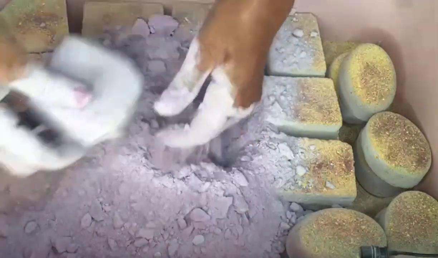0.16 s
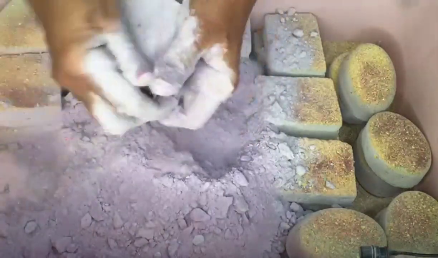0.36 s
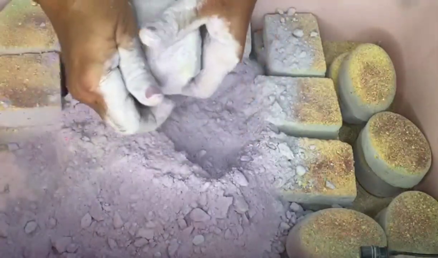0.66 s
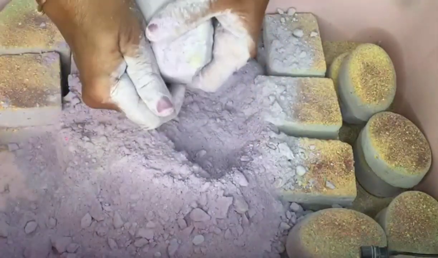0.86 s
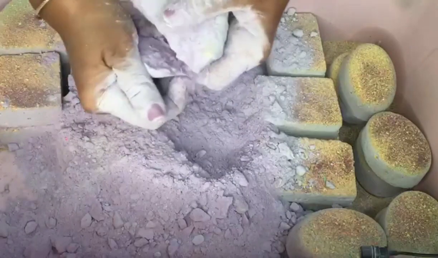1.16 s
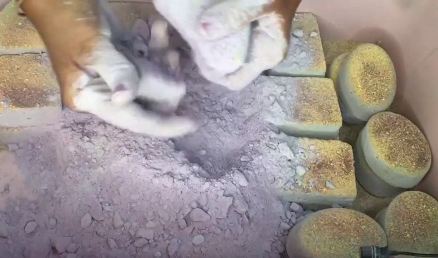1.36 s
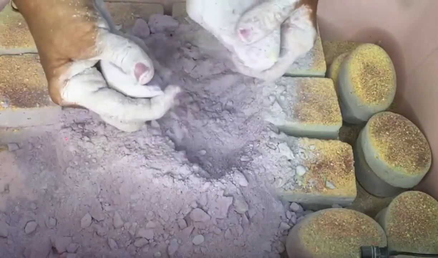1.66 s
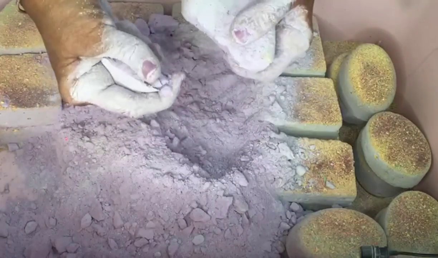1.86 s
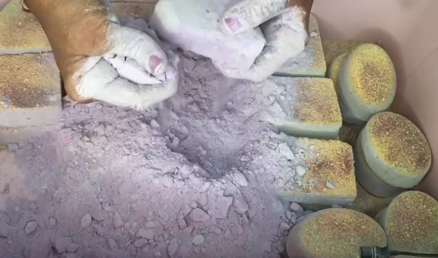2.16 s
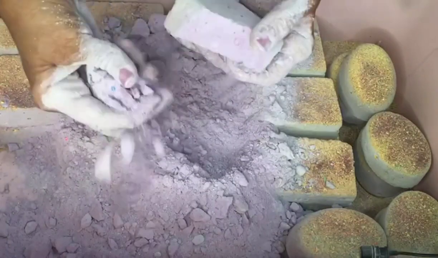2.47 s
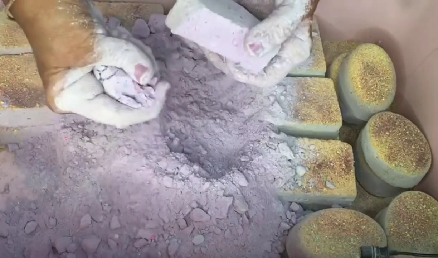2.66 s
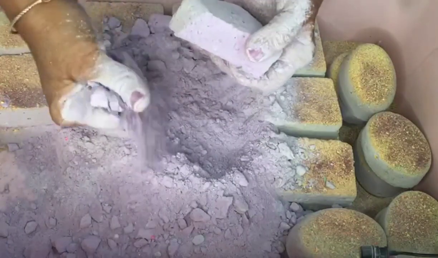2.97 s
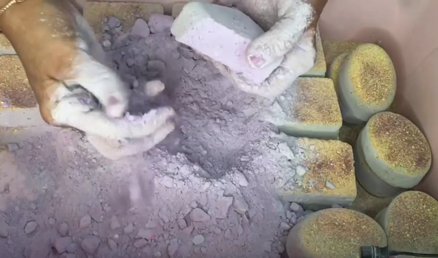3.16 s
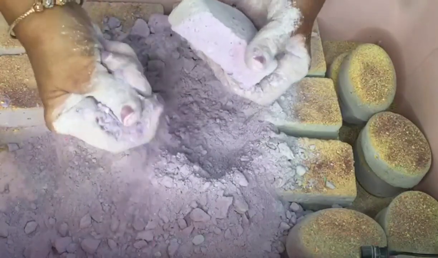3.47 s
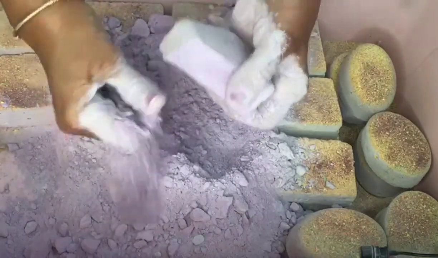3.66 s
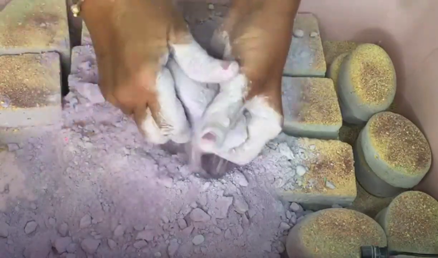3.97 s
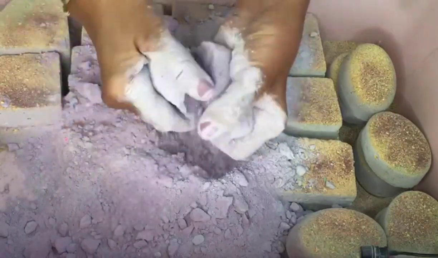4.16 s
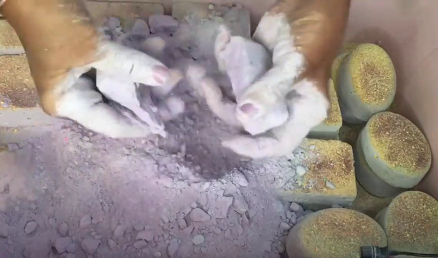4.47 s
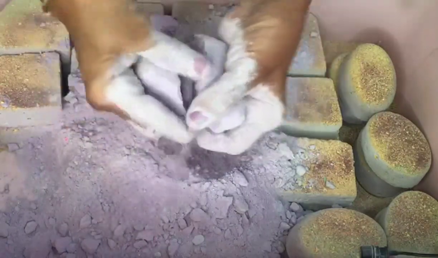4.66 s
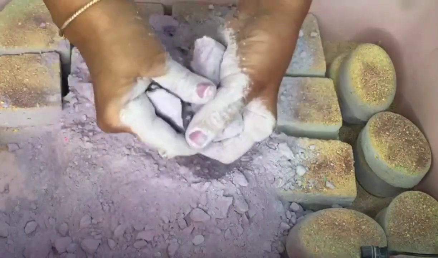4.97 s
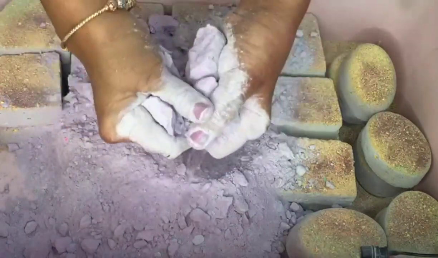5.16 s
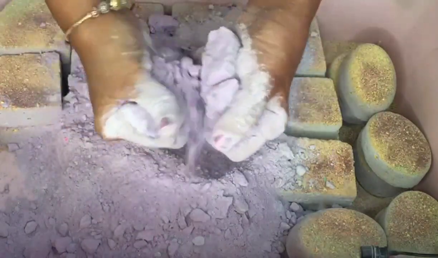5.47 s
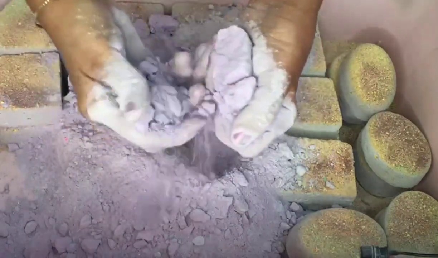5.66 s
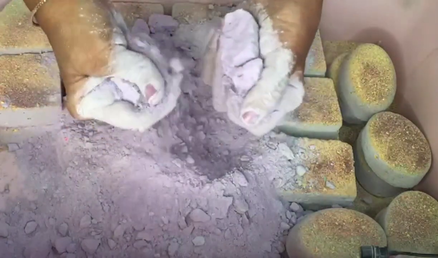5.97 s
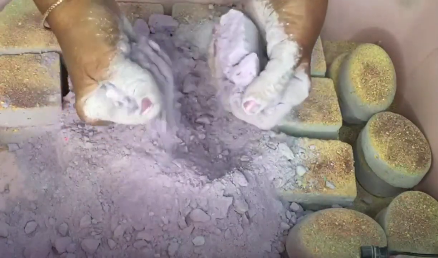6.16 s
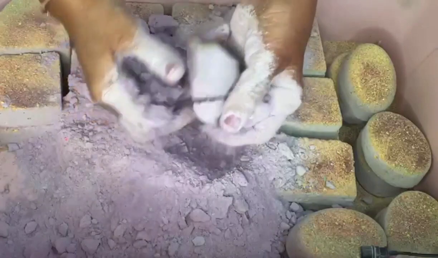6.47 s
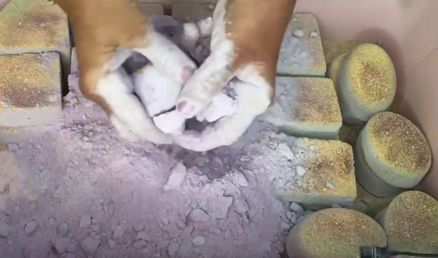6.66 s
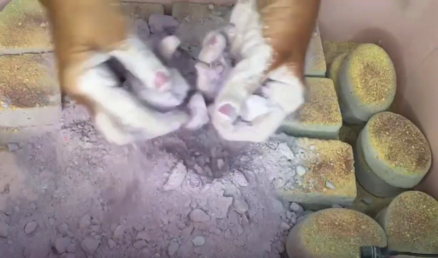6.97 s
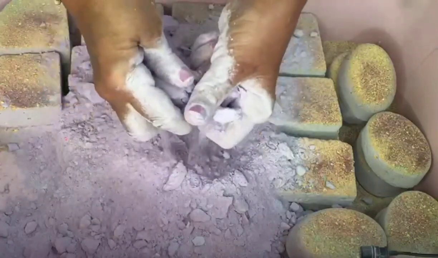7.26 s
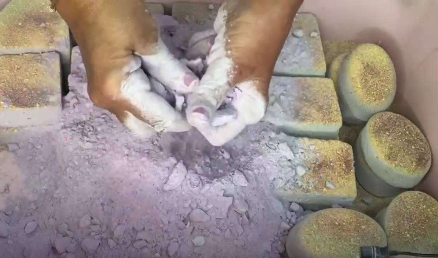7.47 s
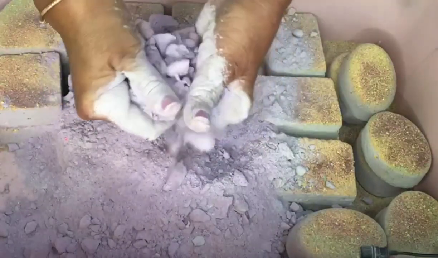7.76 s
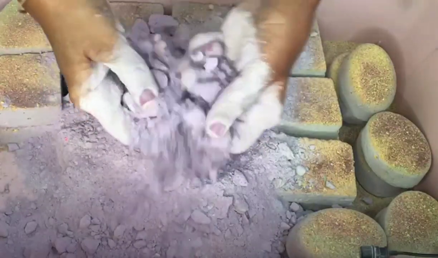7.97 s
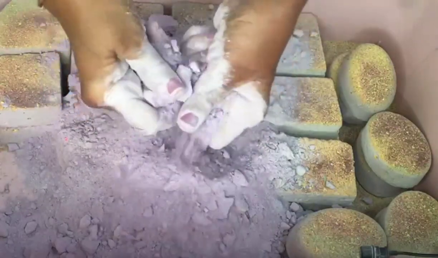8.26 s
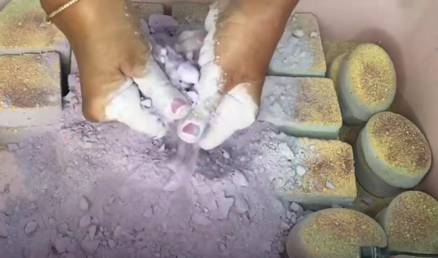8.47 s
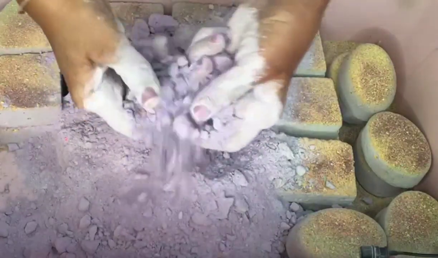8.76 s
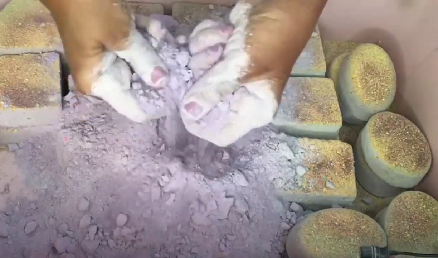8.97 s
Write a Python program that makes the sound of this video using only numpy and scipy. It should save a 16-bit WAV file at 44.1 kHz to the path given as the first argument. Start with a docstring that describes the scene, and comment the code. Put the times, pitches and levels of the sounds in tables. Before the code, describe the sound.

Chalk lumps break in cupped hands right at the microphone, each a short woody knock with a gritty crack, low table thud and scattered fragments. Between breaks, fine powder hisses and crumbs roll and drop. Activity is sparse early, busy near five seconds, calmer, then heavy at eight. The two hardest breaks distort; the small room adds only a weak tail over deep rumble.

```python
"""Blocks of soft chalk break in two hands over a bed of loose powder, close to the microphone.
Each break mixes a short hollow knock of damped modes, a noise crack, a thud in the table and flying fragments.
Nearer the fingers, edges crunch, powder hisses and crumbs patter as random grains; skin squeaks, palms thump.
Loud breaks overload the microphone; behind the hands lie a small room's tail, a deep rumble and a faint hum."""
import sys
import numpy as np
from scipy import signal
from scipy.fft import rfft, irfft, next_fast_len
from scipy.io import wavfile

SR = 44100
rng = np.random.default_rng(int(sys.argv[2]) if len(sys.argv) > 2 else 0)


def log_audio(samples):
    """Write samples as a 16-bit WAV file to the path given in sys.argv[1]."""
    # one column per channel
    frames = np.atleast_2d(samples).T
    # limit to full scale, then quantise
    limited = np.clip(frames, -1, 1)
    pcm = np.round(limited * 32767).astype(np.int16)
    wavfile.write(sys.argv[1], SR, pcm)


N = 402191
TIME = np.arange(N) / SR
HIT_TIME = TIME[:SR // 4]

# Levels are relative within a layer unless marked rms; each function sets its layer's gain.
# A lump snaps or knocks: [t/s, ring level/dB, pitch f/Hz, ring time scale/s, crack level/dB, thud level/dB]
LUMP_SNAPS = [(.185, -27, 1290, 0.011, -37, -63), (.448, -34, 1600, .016, -42, -65),
              (1.278, -35, 960, .008, -37.5, -69), (1.499, -34, 736, .013, -38.5, -50),
              (1.546, -29.5, 900, 0.00274, -33.5, -41.5), (1.7285, -21, 1200, .005, -27.5, -59),
              (1.8033, 4, 707, .034, -20, -15), (1.8105, -2, 834, 0.013, -37, -46),
              (2.0367, -29, 1910, 0.0062, -26, -56), (2.222, -36.5, 826, .015, -55, -53.5),
              (2.361, -38, 1480, 0.009, -43, -63), (2.386, -32.5, 876, .015, -38, -57.5),
              (2.443, -34.5, 1310, 0.033, -36.5, -63), (2.595, -31, 788, 0.023, -34, -42),
              (2.676, -35, 890, .021, -35, -42.5), (2.789, -32.5, 756, 0.0507, -43, -38),
              (2.8149, -12.5, 960, 0.011, -53, -39), (3.11, -39, 1110, .009, -40, -69),
              (3.166, -34.5, 980, .014, -39, -41.5), (3.8, -35.5, 795, 0.031, -40.5, -48.5),
              (4.733, -26, 4860, .008, -42, -64), (4.7925, -14.5, 4800, .008, -32, -58),
              (4.799, -17.5, 1537, .0065, -25, -49), (4.845, -33, 1933, 0.0088, -24, -64),
              (4.866, -23, 1840, .011, -32, -68), (4.8814, -19.5, 2960, 0.0068, -31, -70),
              (5.017, -25.5, 1290, 0.022, -42, -58), (5.125, -25, 870, .007, -32, -71),
              (5.168, -24, 2140, .011, -30, -70), (5.219, -24.5, 1060, 0.00855, -46, -45),
              (5.32, -36, 2240, 0.017, -33.5, -49), (5.3574, -8.5, 1254, 0.011, -36, -41),
              (5.411, -26, 1100, 0.012, -47, -60), (5.44, -18.5, 5200, .006, -33.5, -66),
              (5.506, -18, 1630, .014, -31, -45), (5.5396, -19, 2470, .016, -30, -60),
              (5.55, -17, 1750, .015, -29, -57), (5.5794, -11, 1510, 0.00346, -26, -51),
              (5.626, -3, 974, 0.01, -27, -50), (5.636, -15.5, 1140, 0.0067, -29, -46),
              (5.663, -19, 1332, 0.0068, -57, -51), (5.939, -29.5, 662, .004, -38, -50),
              (6.167, -29, 1266, 0.042, -40, -44.5), (6.561, -37.5, 574, 0.036, -41, -41),
              (6.67, -26, 1415, .004, -32, -67.5), (6.887, -25, 840, 0.0091, -52, -44.5),
              (7.188, -41, 1400, .005, -39, -64), (7.231, -37, 1153, .009, -57.5, -66),
              (7.5345, -37.5, 1020, 0.0062, -38, -54.5), (7.917, -28.5, 910, .022, -48, -42),
              (8.0356, 7, 840, 0.02, -14.5, -11), (8.0417, -3.5, 650, .012, -48, -24),
              (8.159, -21.5, 630, 0.019, -39, -31), (8.206, -11.5, 890, 0.021, -26, -29.5),
              (8.222, -12, 1210, .011, -37, -27), (8.235, -18, 770, 0.021, -53, -20.5),
              (8.267, -15, 780, .036, -45, -24), (8.285, -4.5, 943, .011, -29, -23.5),
              (8.289, -13.5, 700, 0.026, -31, -28), (8.319, -11.5, 1630, .008, -26, -50),
              (8.324, -11.5, 1350, .013, -28, -30.5), (8.935, -25, 686, 0.0091, -38.5, -34),
              (8.992, -20, 794, 0.028, -61, -30), (9.035, -6.5, 798, 0.026, -45, -19)]
# Ring of a lump held in the hand: [multiple of its pitch, level/dB, share of the ring time scale]
LUMP_MODES = [(.64, -15.5, 1.9), (0.998, 8, 0.3), (1.6, -9.5, 0.84), (2.7, 0.5, 0.57)]
# The hollow of the cupped hands, colouring every knock: [f/Hz, level/dB]
HAND_HOLLOW = [(250, 2), (520, 0.5), (660, 0.5), (860, 4), (1130, -5), (1420, 2), (1850, -5.5), (2600, -4),
               (5000, 0)]
# The table under the powder: [f/Hz, level/dB, t60/s]
TABLE_MODES = [(88, -24.5, 0.27), (131, -4, 0.099), (160.3, 0, 0.091), (203.6, -1, 0.083), (255.4, -3, .04),
               (354, 1.5, 0.04), (488, -1, 0.022)]
# An edge crumbles under a finger: [t/s, level/dB, length scale/s]
EDGE_CRUNCHES = [(0.634, -44, .0044), (1.11, -34.5, 0.007), (1.13, -36.5, 0.0064), (1.587, -39, 0.0063),
                 (1.8, -40.5, 0.0078), (1.886, -40, 0.0031), (2.037, -37.5, 0.0057), (4.131, -24.5, 0.0012),
                 (4.68, -37, 0.0094), (4.7, -40, 0.0054), (4.731, -33.5, 0.0042), (4.737, -36.5, 0.01),
                 (4.792, -29, 0.0032), (4.849, -36, 0.0039), (4.943, -38.5, .002), (5.0526, -28, 0.0056),
                 (5.165, -34, 0.0056), (5.393, -38, 0.0038), (5.4085, -37, 0.0018), (5.444, -38, 0.0008),
                 (5.4975, -33, 0.0016), (6.883, -37, 0.0013), (6.905, -41.5, .002), (6.929, -38.5, 0.0017),
                 (7.273, -37, 0.0022), (7.332, -40, 0.0027), (7.369, -41, 0.011), (7.392, -29, 0.0026),
                 (7.918, -38.5, 0.0068), (8.211, -32, 0.001), (8.353, -40.5, 0.0017)]
# Two hands knead without pause, shearing powder and rolling crumbs: [t/s, powder level/dB, crumb level/dB]
KNEADING = [(0, -53.5, -50.5), (.35, -58, -54.5), (.56, -53, -58.5), (1.0, -61, -68), (1.7, -55, -61.5),
            (1.9, -52, -47), (2.18, -60, -62.5), (2.46, -53, -55.5), (2.75, -51.5, -49), (3.0, -53, -53.5),
            (3.11, -59.5, -53.5), (3.3, -54, -54), (3.8, -54.5, -53), (4.24, -59, -58.5), (4.62, -56, -58),
            (4.9, -47.5, -47.5), (5.29, -53.5, -52), (5.8, -52, -55), (6.05, -60, -55.5), (6.25, -53, -56),
            (7.1, -53.5, -53.5), (7.48, -56, -56), (7.82, -54.5, -56.5), (8.0, -50.5, -50.5),
            (8.35, -50, -47), (8.73, -55, -57.5), (9.12, -53, -42.5)]
# A finger wipes through fine powder: [middle t/s, half length/s, level/dB]
WIPES = [(.115, .035, -49), (0.407, 0.029, -41), (0.543, 0.025, -40), (0.668, 0.026, -41),
         (0.844, 0.029, -41.5), (1.338, 0.017, -48.5), (1.394, 0.016, -46), (1.645, 0.053, -48),
         (1.76, 0.046, -57), (2.273, 0.03, -46), (3.025, .02, -48), (3.442, 0.044, -47),
         (3.585, 0.025, -45), (3.657, 0.037, -54), (3.926, 0.024, -42.5), (4.311, 0.025, -47.5),
         (4.375, 0.037, -42.5), (4.534, 0.015, -45), (5.241, 0.0091, -39), (6.83, 0.023, -49),
         (8.638, 0.027, -49.5)]
# A squeeze spills crumbs and coarse powder: [start t/s, length/s, powder level/dB, crumb level/dB]
SPILLS = [(0.166, 0.17, -54.5, -52), (0.656, 0.095, -56, -48.5), (1.112, 0.052, -44, -48),
          (1.292, .04, -47, -48), (1.493, 0.1, -55, -51), (1.742, 0.043, -48, -42),
          (2.025, 0.046, -46, -47), (2.26, 0.031, -46.5, -44.5), (2.374, 0.022, -47, -50.5),
          (2.59, .15, -49.5, -46.5), (3.192, 0.027, -55, -47), (3.26, 0.019, -47, -42),
          (3.371, .13, -49.5, -47), (3.984, 0.14, -50, -58.5), (4.14, 0.044, -47.5, -46.5),
          (4.323, 0.042, -48, -49), (4.778, 0.091, -45, -43), (5.003, 0.096, -45, -44),
          (5.139, 0.094, -46, -45.5), (5.32, 0.078, -44, -44), (5.523, 0.11, -50, -46.5),
          (5.617, 0.31, -57, -50), (5.874, 0.16, -52.5, -51), (6.153, 0.072, -48.5, -44),
          (6.41, 0.035, -66, -48.5), (6.557, 0.11, -49.5, -48), (6.623, 0.062, -57, -43),
          (7.256, 0.031, -46.5, -43), (7.532, 0.058, -46, -50), (7.583, 0.076, -48.5, -53.5),
          (7.729, 0.03, -45.5, -43), (7.925, 0.026, -55, -48), (8.048, 0.23, -49, -50.5),
          (8.21, 0.25, -56, -44), (8.459, 0.045, -50, -47), (8.815, 0.067, -49.5, -52),
          (9.009, 0.02, -45, -43)]
# A finger slides over a whole block's face: [middle t/s, half length/s, rms level at middle/dB, squeak f/Hz]
STROKES = [(.398, 0.013, -42, 4220), (0.453, 0.0099, -36.5, 2870), (0.546, 0.019, -41.5, 3160),
           (0.629, 0.0061, -39, 3060), (0.677, 0.033, -46, 3400), (0.845, 0.028, -41, 3040)]
# Resonances of a sliding finger: [multiple of the squeak pitch, width/Hz, level/dB]
STROKE_MODES = [(1.0, 350, 6), (1.57, 300, 3.5), (2.6, 600, -4)]
# Echoes between the palms and the table: [mean delay/s, level/dB]
PALM_ECHOES = [(.00055, -16), (.0013, -12), (.0024, -13), (.0041, -17)]
# A hand closes on the chalk: [t/s, level/dB]
HAND_THUMPS = [(1.1128, -16.5), (2.595, -31), (3.163, -40), (4.129, -37), (4.795, -26), (5.053, -26.5),
               (7.2694, -24), (7.393, -13.5), (8.041, -15.5)]
# Spectrum of shearing powder: [f/Hz, level/dB]
POWDER_COLOUR = [(300, -1.5), (900, -35.5), (1900, -7.5), (2400, -5), (3100, 0.5), (3800, -1.5),
                 (5000, 0.5), (6200, -5), (7300, 1), (8400, -1), (9600, -5.5), (11000, -6.5),
                 (12500, -34.5)]
# Spectrum of crumbs and fragments: [f/Hz, level/dB]
CRUMB_COLOUR = [(90, -3), (200, -4), (300, 1), (520, 6.5), (650, -1.5), (820, 3.5), (950, 2.5),
                (1130, -4.5), (1370, 4.5), (1800, -15.5), (3000, -12), (6000, -32.5), (12000, -36)]
# Spectrum of a sharp crack: [f/Hz, level/dB]
CRACK_COLOUR = [(400, -3), (1200, -17.5), (2900, -1.5), (3900, -9), (5000, -9), (6300, -15), (8200, -18.5),
                (12000, -23.5)]
# Spectrum of the room's tail: [f/Hz, level/dB]
ROOM_COLOUR = [(60, -24.5), (130, 5.5), (280, 1), (490, 4.5), (630, -1.5), (780, 0.5), (1100, -6.5),
               (1400, 3.5), (2000, 2), (5000, -12), (12000, -19)]
# Spectrum of the deep rumble: [f/Hz, level/dB]
RUMBLE_COLOUR = [(2, -1), (8, 2), (15, -5), (25, -1), (31, -17.5), (45, -25.5), (70, -25), (110, -32),
                 (190, -36), (300, -42), (1000, -60.5), (12000, -65)]
# Faint hum in the room: [f/Hz, mean rms level/dB]
HUM_TONES = [(88, -59), (197, -70), (210, -63.5)]


def snaps(crack_db=2, thud_db=-2, crack_t60_s=0.012):
    """Each break is a brief crack, a few cycles of the lump's ring, a thud and a patter of fragments."""
    grit_db, grit_t60_s = -21, 0.041
    debris_db, debris_t60_s = -33, 0.2
    mean_ring_s = np.mean(np.array(LUMP_SNAPS)[:, 3])
    body, thuds, cracks, grit, debris = np.zeros((5, N))
    for s, ring_level, hz, ring_s, crack_level, thud_level in LUMP_SNAPS:
        add(body, s, undb(ring_level) * lump(hz, ring_s))
        add(thuds, s, undb(thud_level + thud_db) * thud())
        add(cracks, s, undb(crack_level + crack_db) * fade(HIT_TIME, crack_t60_s))
        # grit bursts out at once; big lumps, which ring longer, shed more debris afterwards
        bulk = ring_s / mean_ring_s
        add(grit, s, undb(ring_level + grit_db) * fade(HIT_TIME, grit_t60_s))
        add(debris, s, bulk * undb(ring_level + debris_db) * fade(HIT_TIME, debris_t60_s))
    patter = grit * grains(rate=2500, spread_db=4) + debris * grains(rate=700, spread_db=4)
    knocks = colour(body, HAND_HOLLOW)
    crack_noise = colour(cracks * rng.standard_normal(N), CRACK_COLOUR)
    return knocks + thuds + crack_noise + colour(patter, CRUMB_COLOUR)


def lump(hz, ring_s, rise_cycles=0.65, scatter=0.12, low_edge=0.46, high_edge=1.68):
    """A few cycles of a lump's damped modes; peak 1."""
    ring = np.zeros(len(HIT_TIME))
    # no two lumps have the same shape, so the side modes scatter around the main one
    for ratio, mode_db, share in LUMP_MODES:
        level_chance, pitch_chance = rng.standard_normal(2)
        mode_hz = hz * ratio ** (1 + scatter * pitch_chance)
        envelope = undb(mode_db + level_chance) * fade(HIT_TIME, ring_s * share)
        ring += envelope * np.sin(2 * np.pi * mode_hz * HIT_TIME)
    # big, low lumps give way more slowly than small ones
    ring *= 1 - np.exp(-(HIT_TIME * hz / rise_cycles) ** 2)
    # a small body radiates little below its own pitch, and soft chalk little far above it
    edges = low_edge * hz, high_edge * hz
    ring = signal.sosfilt(signal.butter(2, edges, "band", fs=SR, output="sos"), ring)
    return ring / np.abs(ring).max()


def thud(rise_s=0.0073, level_scatter_db=4.2, pitch_scatter=0.048):
    """The table's damped low modes after a blow; rms 1 over the first 30 ms."""
    ring = np.zeros(len(HIT_TIME))
    for k, (hz, db, t60) in enumerate(TABLE_MODES):
        level_chance, pitch_chance = rng.standard_normal(2)
        mode_hz = hz * (1 + pitch_scatter * pitch_chance)
        envelope = undb(db + level_scatter_db * level_chance) * fade(HIT_TIME, t60)
        sign = (-1) ** k  # neighbouring modes start in opposite directions
        ring += sign * envelope * np.sin(2 * np.pi * mode_hz * HIT_TIME)
    ring *= 1 - np.exp(-HIT_TIME / rise_s)
    return ring / np.std(ring[:SR // 33])


def crunches(crunch_db=3, body_db=-11, rise_s=0.00076, stretch=1.4):
    """An edge gives way in an avalanche of fine fractures."""
    force = np.zeros(N)
    for s, db, length in EDGE_CRUNCHES:
        shape = (1 - np.exp(-HIT_TIME / rise_s)) * np.exp(-(HIT_TIME / (stretch * length)) ** 1.3)
        add(force, s, undb(db + crunch_db) * shape / shape.max())
    fractures = force * grains(rate=16000, spread_db=4)
    return colour(fractures, POWDER_COLOUR) + undb(body_db) * colour(fractures, CRUMB_COLOUR)


def powder(knead_db=2, tick_db=-11, flutter_db=1.57, uneven_db=0.03, coarse_hz=4200):
    """Fine grains shear in a dense hiss with lone ticks; wipes sound fine, spills have more low treble."""
    db, _ = curves(KNEADING)
    knead = undb(db + knead_db + uneven_db * walk(rate=16))
    wipe = wiping()
    spill, _ = spilling()
    fine = undb(flutter_db * walk(rate=100)) * grains(rate=14000, spread_db=7)
    lone = undb(tick_db) * grains(rate=130, spread_db=14)
    hiss = colour(fine + lone, POWDER_COLOUR)
    low = signal.sosfiltfilt(signal.butter(2, coarse_hz, fs=SR, output="sos"), hiss)
    # the three movements add by power; each has its own share of coarse sound
    high_gain = np.linalg.norm([knead, wipe, spill], axis=0)
    low_gain = np.linalg.norm([undb(-0.5) * knead, undb(-6) * wipe, undb(4) * spill], axis=0)
    return high_gain * (hiss - low) + low_gain * low


def wiping():
    """Strength of the fingers' wipes through the powder: a bell-shaped swell for each."""
    strength = np.zeros(N)
    middle = HIT_TIME.mean()
    for s, half_length, db in WIPES:
        add(strength, s - middle, undb(db) * np.exp(-.5 * ((HIT_TIME - middle) / half_length) ** 2))
    return strength


def spilling(rise_s=0.0028):
    """Flow of powder and of crumbs: each spill starts quickly, runs for a while and dries up."""
    dust, bits = np.zeros((2, N))
    t = TIME[:SR // 2]
    for s, length, powder_db, crumbs_db in SPILLS:
        shape = (1 - np.exp(-t / rise_s)) * np.exp(-(t / length) ** 2)
        shape /= shape.max()
        add(dust, s, undb(powder_db) * shape)
        add(bits, s, undb(crumbs_db) * shape)
    return dust, bits


def crumbs(knead_db=-1, roll_db=-3, drop_db=-4, flutter_db=3.4):
    """Crumbs roll in the cupped hands and larger ones drop with dull ticks, most of all in a spill."""
    _, db = curves(KNEADING)
    _, bits = spilling()
    flow = np.hypot(undb(db + knead_db), bits)
    rolling = undb(roll_db + flutter_db * walk(rate=60)) * grains(rate=1200, spread_db=4)
    drops = undb(drop_db) * grains(rate=70, spread_db=5)
    return flow * colour(rolling + drops, CRUMB_COLOUR)


def ticks(tick_db=-13):
    """Single grains crack at random with sharp little ticks, louder where powder is moving."""
    db, _ = curves(KNEADING)
    dust, _ = spilling()
    flow = np.hypot(undb(db), dust)
    return undb(tick_db) * flow * colour(grains(rate=60, spread_db=8.5), CRACK_COLOUR)


def strokes():
    """Dry skin sticks and slips over smooth chalk: noise through resonances makes short, breathy squeaks."""
    out = np.zeros(N)
    middle = HIT_TIME.mean()
    for s, half_length, db, hz in STROKES:
        slips = rng.standard_normal(len(HIT_TIME))
        squeak = np.zeros(len(HIT_TIME))
        for ratio, width, mode_db in STROKE_MODES:
            b, a = signal.iirpeak(hz * ratio, hz * ratio / width, SR)
            squeak += undb(mode_db) * signal.lfilter(b, a, slips)
        swell = np.exp(-.5 * ((HIT_TIME - middle) / half_length) ** 2)
        add(out, s - middle, undb(db) * unit(squeak) * swell)
    return out


def palms(x, motion=0.115):
    """Short echoes inside the moving hands comb the treble into shifting patches; power is roughly kept."""
    out, power = x, 1
    for delay_s, db in PALM_ECHOES:
        lag_s = delay_s * (1 + motion * walk(rate=8))
        out = out + undb(db) * np.interp(TIME - lag_s, TIME, x)
        power += undb(db) ** 2
    return out / np.sqrt(power)


def thumps(thump_db=7, thump_hz=85, t60_s=0.011):
    """A hand closes on the chalk with a soft thump: one heavily damped low swing."""
    swing = fade(HIT_TIME, t60_s) * np.sin(2 * np.pi * thump_hz * HIT_TIME)
    out = np.zeros(N)
    for s, db in HAND_THUMPS:
        add(out, s, undb(db + thump_db) * swing)
    return out


def room(x, room_db=-31, t60_s=0.44, treble_t60_s=0.2, treble_hz=1800, build_s=0.0086):
    """A small furnished room: a weak tail of decaying noise whose treble dies first."""
    t = TIME[:SR * 3 // 4]
    noise = rng.standard_normal(len(t))
    low = signal.sosfilt(signal.butter(2, treble_hz, fs=SR, output="sos"), noise)
    high = signal.sosfilt(signal.butter(2, treble_hz, "high", fs=SR, output="sos"), noise)
    tail = low * fade(t, t60_s) + high * fade(t, treble_t60_s)
    tail *= 1 - np.exp(-t / build_s)
    tail = colour(tail / np.sqrt(np.sum(tail ** 2)), ROOM_COLOUR)
    return undb(room_db) * signal.fftconvolve(x, tail)[:N]


def rumble(level_db=-31, swell_db=-1.5):
    """A deep rumble of filtered noise, slowly wobbling in level under everything."""
    noise = unit(colour(rng.standard_normal(N), RUMBLE_COLOUR))
    return undb(level_db + swell_db * walk(rate=0.98)) * noise


def hum(waver_db=2, drift_rad=1.0):
    """Low sine tones that waver a little in level and pitch."""
    out = np.zeros(N)
    for hz, db in HUM_TONES:
        level = np.sqrt(2) * undb(db + waver_db * walk(rate=2.4))
        out += level * np.sin(2 * np.pi * hz * TIME + drift_rad * walk(rate=1.5))
    return out


def grains(rate, spread_db):
    """Tiny fractures at random moments, rate a second on average, many small and a few large; rms 1."""
    sizes = undb(spread_db * np.clip(rng.standard_normal(N), -2, 2)) * rng.choice([-1, 1], N)
    return unit(sizes * (rng.random(N) < rate / SR))


def walk(rate):
    """Smooth chance with a spread near 1: lines between random points, rate points a second."""
    steps = rng.standard_normal(N // 100)
    return np.interp(TIME * rate, np.arange(len(steps)), steps) * np.sqrt(3 / 2)


def colour(x, points):
    """Causal minimum-phase filter through (f/Hz, level/dB) points that keeps the power of white noise."""
    size = next_fast_len(len(x) + 4096, True)
    hz, db = np.transpose(points)
    bins_hz = np.fft.rfftfreq(size, 1 / SR)
    gain = unit(undb(np.interp(np.log(bins_hz + 1), np.log(hz + 1), db)))
    # folding the cepstrum onto positive time makes the filter causal
    cepstrum = irfft(np.log(gain), size)
    cepstrum[1:size // 2] *= 2
    cepstrum[size // 2 + 1:] = 0
    return irfft(rfft(x, size) * np.exp(rfft(cepstrum)), size)[:len(x)]


def fade(t, t60):
    """Exponential decay by 60 dB in t60 seconds."""
    return np.exp(-np.log(1000) * t / t60)


def curves(table):
    """Each column of a table as a line through time."""
    s, *columns = np.transpose(table)
    return [np.interp(TIME, s, c) for c in columns]


def add(track, s, sound):
    """Mix a sound into a track at time s."""
    start = max(int(s * SR), 0)
    track[start:start + len(sound)] += sound[:N - start]


def undb(db):
    """Decibels to gain."""
    return 10 ** (np.asarray(db) / 20)


def unit(x):
    """Scale to rms 1."""
    return x / np.sqrt(np.mean(x ** 2))


def scene():
    """Chalk in the hands close up, then the room's answer, the rumble and the hum."""
    chalk = snaps() + crunches() + palms(powder() + strokes()) + crumbs() + ticks() + thumps()
    return (chalk + room(chalk) + rumble() + hum())[None]


def record(dry, top_hz=11800):
    """The microphone clips at full scale; a steep low-pass then cuts the top."""
    clipped = np.clip(dry, -1, 1)
    return signal.sosfilt(signal.ellip(8, .2, 60, top_hz, fs=SR, output="sos"), clipped)


dry = scene()
out = record(dry)
log_audio(out)
```